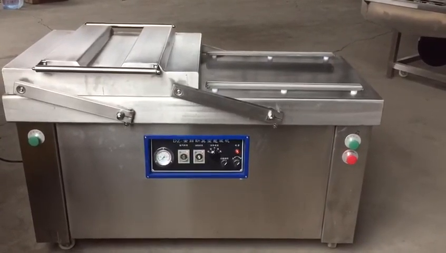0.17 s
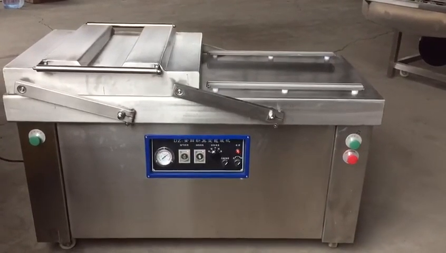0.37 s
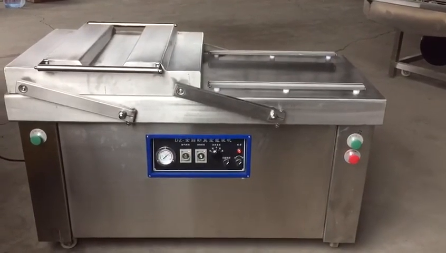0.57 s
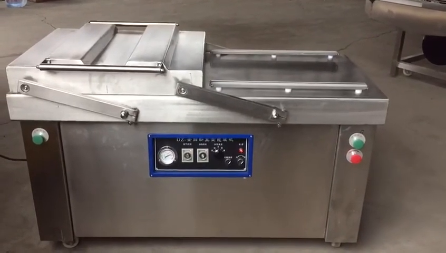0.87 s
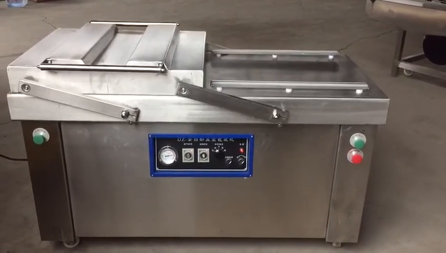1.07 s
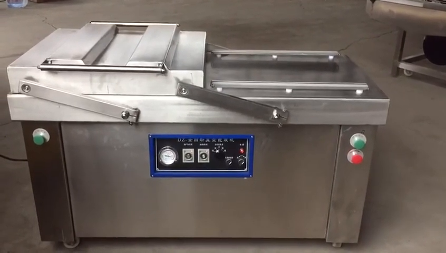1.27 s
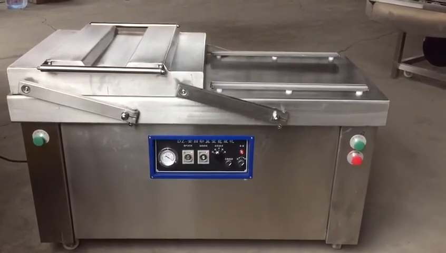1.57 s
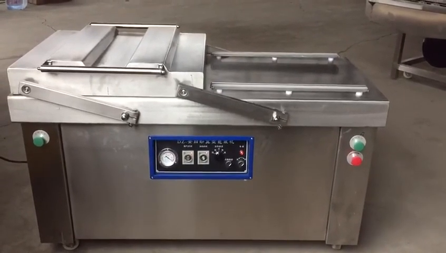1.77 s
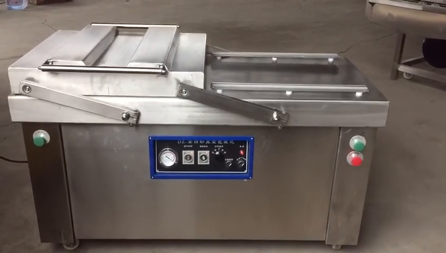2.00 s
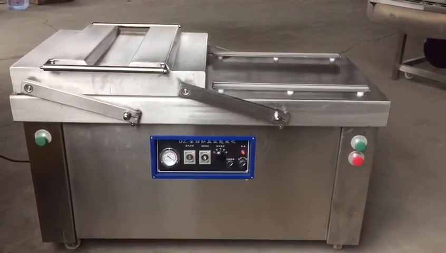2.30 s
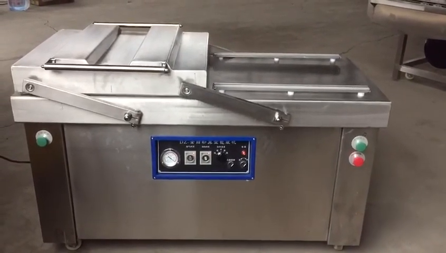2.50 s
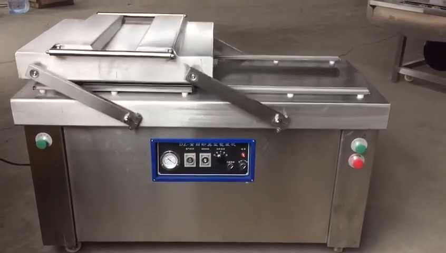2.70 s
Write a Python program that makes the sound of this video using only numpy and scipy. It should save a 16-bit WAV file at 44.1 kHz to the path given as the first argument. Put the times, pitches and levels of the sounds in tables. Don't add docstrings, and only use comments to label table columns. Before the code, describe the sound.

Air rushes into a vacuum packing machine over a constant churning pump drone. At 0.23 s a valve ticks and slams at 0.25, releasing a bright, strong hiss. A thud at 0.83 adds a hollow steel-chamber roar. Both fade from about 1.4 to 2.45 s, treble first. At 2.48 the seal cracks, lid clunks and arms knock; patchy air seeps, with a light tap at 2.7. Short workshop echo.

```python
import sys
import numpy as np
from scipy import signal
from scipy.fft import rfft, irfft
from scipy.io import wavfile

SR = 44100
rng = np.random.default_rng(int(sys.argv[2]) if len(sys.argv) > 2 else 0)


def unload_wav(signal):
    wavfile.write(
        sys.argv[1],
        SR,
        np.round(np.clip(np.atleast_2d(signal).T, -1, 1) * 32767).astype(np.int16),
    )


def convert_level_to_amplitude(level_db):
    exponent = np.asarray(level_db, float) / 20
    return 10 ** exponent


N = 125685


def rms_one(x):
    return x / np.sqrt(np.mean(x ** 2) + 1e-20)


def curve(rows):
    s, db = np.transpose(rows)
    return np.interp(np.arange(N) / SR, s, db, left=-140)


def at_hz(points, hz):
    table_hz, value = np.transpose(points)
    return np.interp(np.log(hz), np.log(table_hz), value)


def drift(rate):
    r = np.exp(-80 * np.pi * rate / SR)
    white = rng.standard_normal(N // 40 + 2002)
    slow = signal.lfilter([1], [1, -2 * r, r * r], white)[2000:]
    return np.interp(np.arange(N) / 40, np.arange(len(slow)), rms_one(slow))


def ring(x, hz, t60):
    r, w = convert_level_to_amplitude(-60 / (t60 * SR)), 2 * np.pi * hz / SR
    return signal.lfilter([0, np.sin(w)], [1, -2 * r * np.cos(w), r * r], x + 1e-18)


def air(spectrum, peaks, peak_db, patchy_db, level_db, follows=((100, 1), (200, 1))):
    f = np.arange(1, N // 2 + 2) * SR / N
    power = convert_level_to_amplitude(2 * at_hz(spectrum, f))
    for hz, width, db in peaks:
        power = power + convert_level_to_amplitude(2 * (db + peak_db)) / (1 + (2 * (f - hz) / max(width, 4)) ** 2) ** 2
    power = power * (f > spectrum[0][0] / 2) * np.minimum(1, (spectrum[-1][0] / f) ** 6)
    noise = rfft(rng.standard_normal(N)) * np.sqrt(power / power.mean())
    out, shared, top = 0, drift(2.5), level_db.max()
    for hz in 30 * 2 ** np.arange(0, 9, 1 / 3):
        band = np.cos(np.pi / 2 * np.clip(3 * np.log2(f / hz), -1, 1)) ** 2
        patches = patchy_db * (.5 * shared + drift(20.0))
        db = top + at_hz(follows, hz) * (level_db - top) + patches
        out = out + convert_level_to_amplitude(db) * irfft(noise * band, N)
    return out * (level_db > -130)


def burst(spectrum, s, db, rise, t60):
    age = np.maximum(np.arange(N) / SR - s, 0)
    shape = (1 - np.exp(-age / rise)) * convert_level_to_amplitude(-60 * age / t60)
    return shape * air(spectrum, [], 0, 0.94, np.full(N, db * 1.))


def pump():
    # frequency in Hz, level in dB per Hz.
    spectrum = [(24, -80), (40, -17.5), (183, -7), (246, -18), (515, -9), (797, -13), (1320, -5),
                (1960, -18.5), (9800, -33.5), (12700, -72), (21600, -120)]
    # frequency in Hz, width in Hz, level in dB.
    cabinet = [(96.5, 8.6, -11.5), (133, 16, -13.5), (197.3, 13, -4.5), (289.5, 61, -7.5),
               (517.8, 10.3, -5), (1082, 79, -4.5), (1285, 58, 0.5), (3630, 340, -16)]
    return air(spectrum, cabinet, peak_db=3.0, patchy_db=0.6, level_db=np.full(N, -34.5))


def jet():
    # time in seconds, level in dB.
    flow = [(.228, -82), (.233, -35), (.243, -31), (.2485, -21.5), (.2505, -14), (.33, -19), (.6, -19),
            (.9, -19.5), (1.4, -22), (1.75, -27), (2.1, -39.5), (2.45, -50), (2.7, -63.5)]
    # frequency in Hz, level in dB per Hz.
    spectrum = [(410, -21), (700, -23), (1000, -15), (1280, -11.5), (1940, -14), (2640, -7), (4810, -5.5),
                (5930, -1), (9600, -6), (12500, -56), (21100, -120)]
    # frequency in Hz, share as a ratio.
    follows = [(1500, 0.31), (3500, 0.89), (5000, 0.99), (9000, 1.4)]
    # frequency in Hz, width in Hz, level in dB.
    housing = [(3663, 60, 0), (3830, 120, -2), (4190, 250, 0), (5744, 40, 4), (5881, 40, 4), (6153, 60, 3),
               (6410, 60, 4), (6592, 45, 5), (6707, 35, 2), (6867, 50, 4), (7010, 35, 4), (7387, 40, 3),
               (7533, 30, 3), (8430, 230, 0)]
    return air(spectrum, housing, peak_db=-4.0, patchy_db=.8, level_db=curve(flow), follows=follows)


def valve():
    # start in seconds, level in dB, thump level in dB, contact cut in Hz.
    hits = [
        (0.2305, -19.5, -57, 2800),
        (0.33, -19, -62, 4300),
        (.2465, -37, -15, 15000),
        (.2545, -33, -14.5, 8000),
        (.2498, -14.5, -47, 11000),
    ]
    # frequency in Hz, level in dB, t60 in seconds.
    body = [(66, -12.5, .12), (82, -11, 0.086), (95.3, -2.5, 0.12), (104.7, -17.5, 0.72),
            (244.3, -11.5, 0.14), (2790, -4, .045), (3000, -10, 0.018), (3230, -6, 0.022),
            (8800, -10, .015)]
    out = np.zeros(N)
    for s, db, thump_db, cut_hz in hits:
        click = np.zeros(N)
        click[int(s * SR)] = 1
        for hz, mode_db, t60 in body:
            soft = signal.lfilter(*signal.butter(2, min(cut_hz, 8.9 * hz), fs=SR), click)
            hit_db = thump_db if hz < 500 else db
            out += convert_level_to_amplitude(mode_db + hit_db) * ring(soft, hz, t60)
    return out


def thuds():
    # start in seconds, level in dB, rise in seconds, t60 in seconds.
    blows = [
        (0.249, -20.5, 0.0038, 0.13),
        (.832, -24, 0.0035, 0.2),
        (2.485, -37, 0.0059, 0.33),
        (2.529, -25, 0.011, 0.2),
    ]
    # frequency in Hz, level in dB per Hz.
    spectrum = [(45, -32), (80, -17.5), (150, -1.5), (300, -5), (600, -10.5), (1000, -8), (1600, -28)]
    return sum(burst(spectrum, *blow) for blow in blows)


def roar():
    # time in seconds, level in dB.
    fill = [(.826, -68.5), (.838, -24.5), (.9, -22), (1.06, -22), (1.3, -22), (1.55, -25), (2.1, -31.5),
            (2.45, -41), (2.66, -49), (2.76, -38.5), (2.85, -39)]
    # frequency in Hz, level in dB per Hz.
    spectrum = [(29, -46), (50, -13.5), (169, -5.5), (261, -10), (702, -9.5), (1270, -2.5), (2040, -12),
                (4190, -12.5), (4700, -11), (6110, -44), (10300, -120)]
    # frequency in Hz, share as a ratio.
    follows = [(100, 3.2), (400, 2.3), (720, 3.5), (950, 1.3), (1400, 0.7), (2500, 0.43), (4500, 1.08)]
    # frequency in Hz, width in Hz, level in dB.
    chamber = [(106, 57, -1.5), (262.7, 64, 5), (919, 70, 2), (1136, 23, -5), (1229, 17, -3),
               (1430, 37, -5.5), (1640, 82, -8), (3970, 210, -9.5), (4360, 140, -5)]
    return air(spectrum, chamber, peak_db=-3.0, patchy_db=2.0, level_db=curve(fill), follows=follows)


def seep():
    # time in seconds, level in dB.
    leak = [(2.48, -72), (2.5, -32.5), (2.6, -41.5), (2.66, -40), (2.7, -44), (2.706, -44), (2.71, -36),
            (2.717, -54), (2.724, -36), (2.85, -35)]
    # frequency in Hz, level in dB per Hz.
    spectrum = [(120, -60), (200, 6.5), (403, -4), (466, -13), (605, -3), (1110, 3), (2230, -33),
                (4130, -14), (9800, -20), (12700, -60), (21600, -120)]
    # frequency in Hz, width in Hz, level in dB.
    gap = [(4130, 390, 11), (5650, 640, -7), (6150, 200, -1)]
    return air(spectrum, gap, peak_db=-10.0, patchy_db=5.5, level_db=curve(leak))


def lid():
    # start in seconds, rattle level in dB, length in seconds, cut in Hz.
    contacts = [
        (2.4826, -22, 0.013, 9000),
        (2.526, -18, 0.013, 1520),
        (2.542, -20, 0.011, 1500),
        (2.707, -29.5, 0.0024, 3000),
    ]
    # frequency in Hz, level in dB, t60 in seconds.
    steel = [(107.7, -2.5, 0.091), (284, -13.5, 0.18), (478, -3.5, 0.094), (866.6, -7, 0.17),
             (1070, 0, 0.078), (1306, -11, 0.18), (1366, -15, 0.075), (1796, -6, 0.074), (1870, -12, 0.11),
             (3970, -1.5, 0.14), (4200, -6, 0.071), (5380, 6, 0.097), (5850, -2, 0.044), (6100, -8, .05)]
    # frequency in Hz, level in dB per Hz.
    crack = [(59, -47), (100, -18), (595, -43), (1020, -18), (1380, -6), (1880, -10), (2500, -21),
             (4050, -13), (5800, -10), (7000, -16), (9800, -17), (12700, -62), (21600, -120)]
    clicks_per_s = 1900
    t, out = np.arange(N) / SR, np.zeros(N)
    for s, db, length, cut_hz in contacts:
        dying = (t > s) * np.exp(-np.maximum(t - s, 0) / length)
        clicks = (rng.random(N) < clicks_per_s / SR) * dying
        clicks = clicks / np.sqrt(clicks_per_s * length)
        modes = 0
        for hz, mode_db, t60 in steel:
            modes = modes + convert_level_to_amplitude(mode_db) * ring(clicks * rng.standard_normal(N), hz, t60)
        out += convert_level_to_amplitude(db) * signal.lfilter(*signal.butter(2, cut_hz, fs=SR), modes)
    return out + burst(crack, contacts[0][0], db=-13, rise=0.00022, t60=0.17)


def arms():
    # start in seconds, frequency in Hz, level in dB, t60 in seconds.
    knocks = [
        (2.4855, 1355, -18, .08),
        (2.4895, 1035, -20, .08),
        (2.487, 1720, -23, .08),
        (2.486, 780, -29, .07),
        (2.484, 105, -27, .12),
        (2.489, 4020, -22, .09),
    ]
    out = np.zeros(N)
    for s, hz, db, t60 in knocks:
        click = 1. * (np.arange(N) == int(s * SR))
        out += convert_level_to_amplitude(db) * ring(click, hz, t60)
    return out


def shop(x):
    t60, echo_db = 0.95, -11
    t = np.arange(SR) / SR
    tail = rng.standard_normal(SR) * convert_level_to_amplitude(-60 * t / t60) * (t > .008)
    tail = signal.lfilter(*signal.butter(1, [150, 5000], "band", fs=SR), tail)
    return convert_level_to_amplitude(echo_db) * signal.fftconvolve(x, tail / np.sqrt(np.sum(tail ** 2)))[:N]


def scene():
    drone = pump()
    near = jet() + roar() + seep() + valve() + lid() + arms() + thuds()
    near = signal.sosfilt(signal.butter(3, 52, "high", fs=SR, output="sos"), near)
    return (drone + near + shop(near))[None]


def low_pass(x):
    return signal.sosfilt(signal.butter(12, 10750, fs=SR, output="sos"), x)


def record(dry):
    # frequency in Hz, width in Hz, level in dB.
    dips = [(712, 91, -6), (4800, 390, -3.5), (7620, 400, -2), (9430, 430, -1.5)]
    f = np.arange(N // 2 + 1) * SR / N
    tone_db = sum(db / (1 + (2 * (f - hz) / width) ** 2) for hz, width, db in dips)
    x = irfft(rfft(dry[0]) * convert_level_to_amplitude(tone_db), N)
    x = signal.sosfilt(signal.butter(2, 30, "high", fs=SR, output="sos"), x)
    return low_pass(x)


dry = scene()
out = record(dry)
unload_wav(out)
```